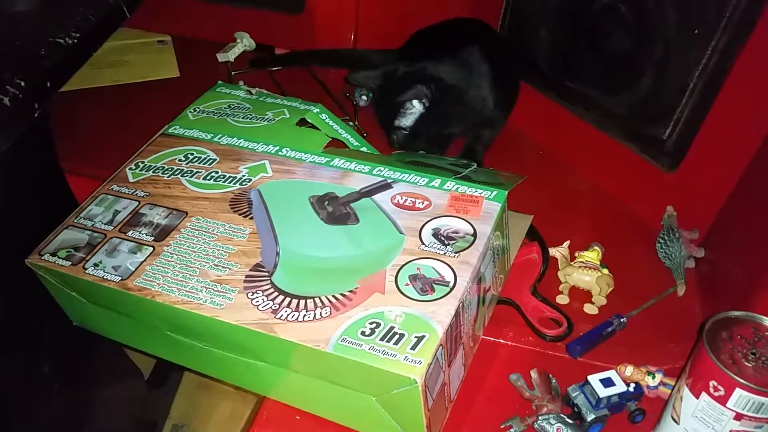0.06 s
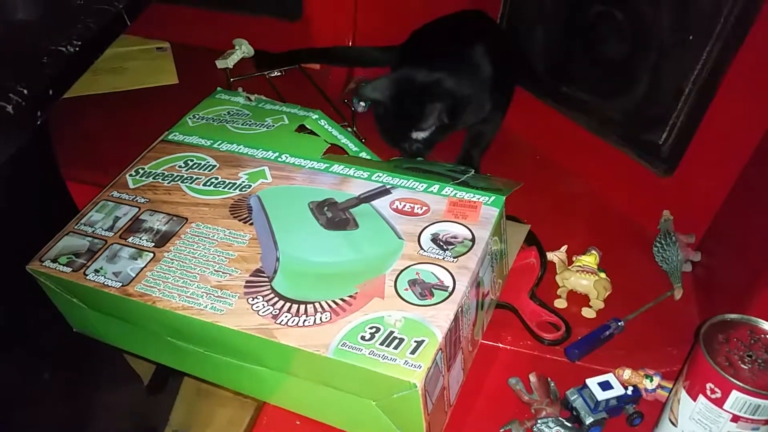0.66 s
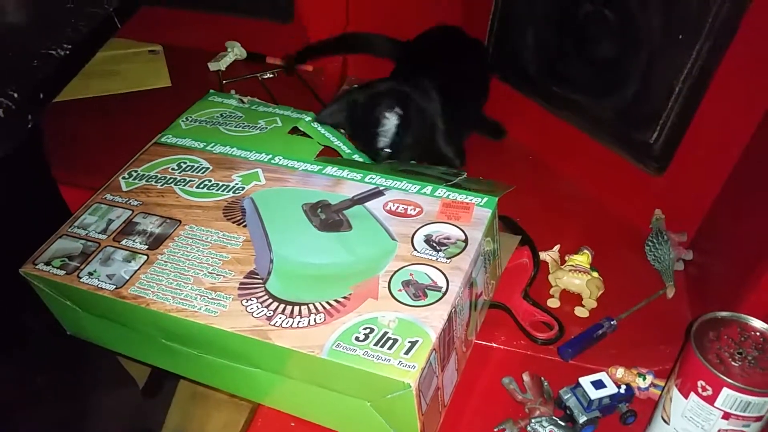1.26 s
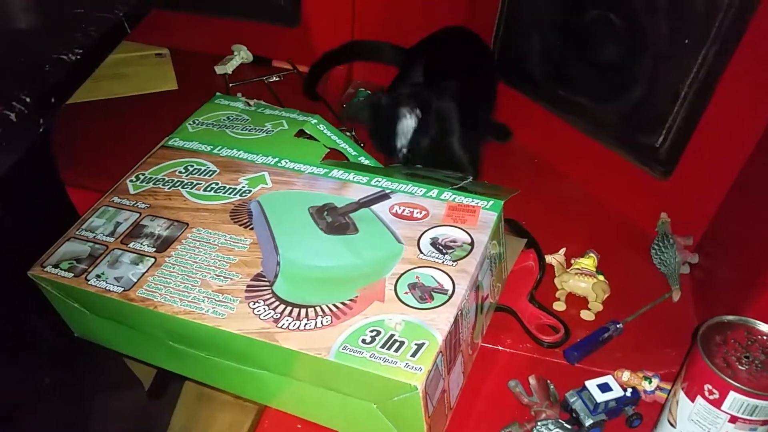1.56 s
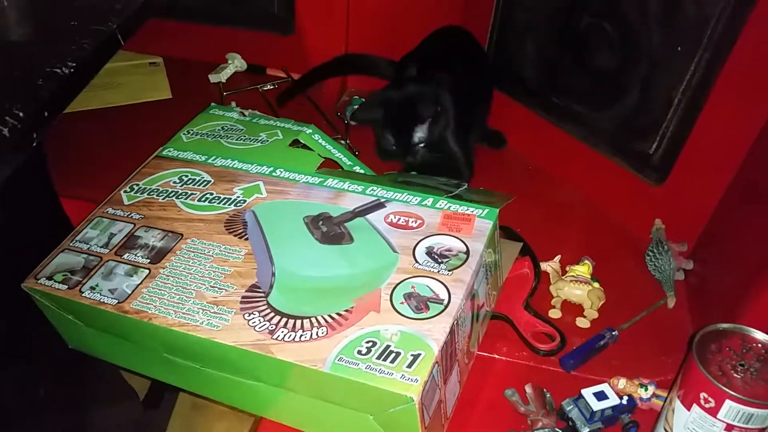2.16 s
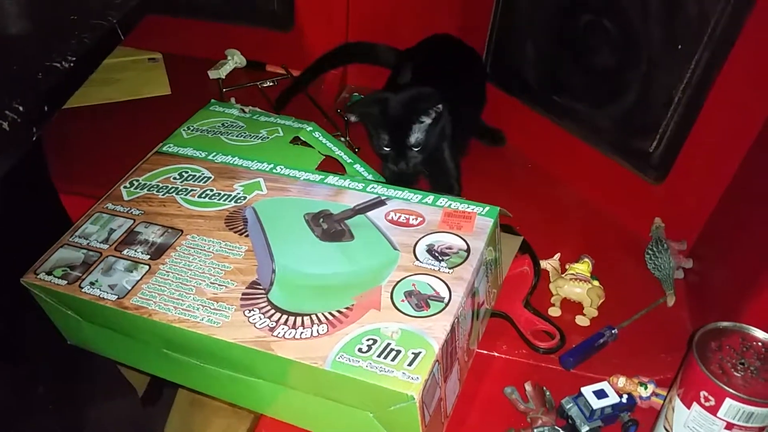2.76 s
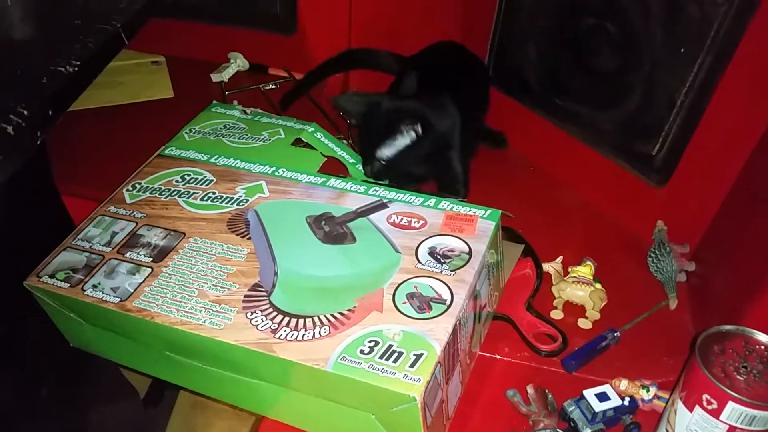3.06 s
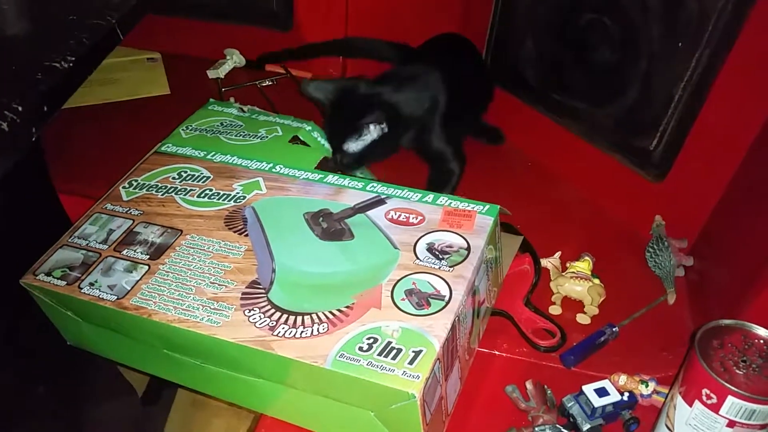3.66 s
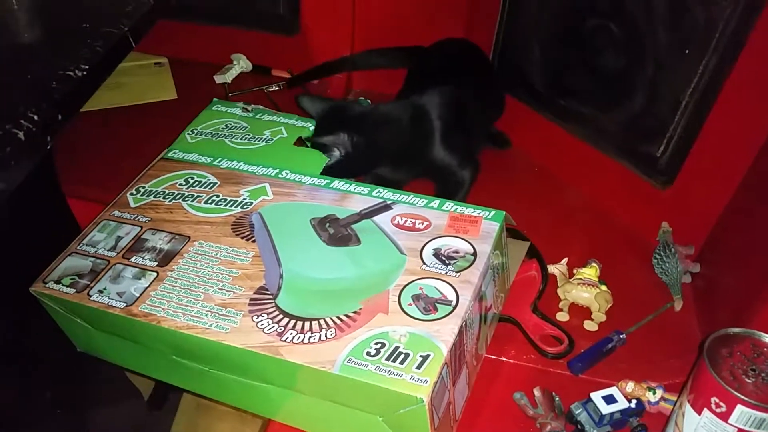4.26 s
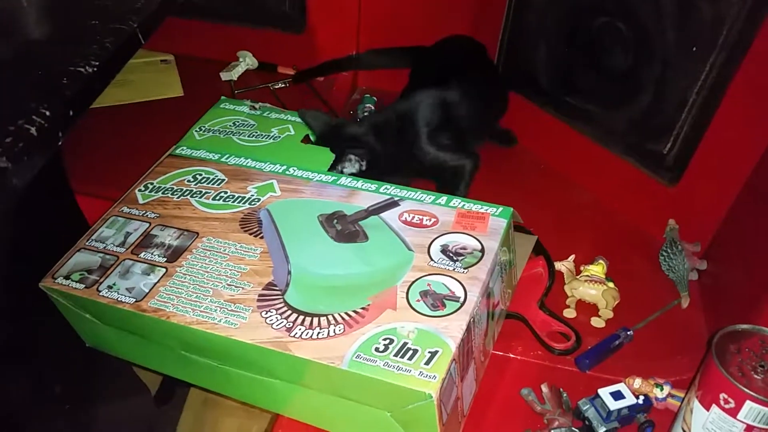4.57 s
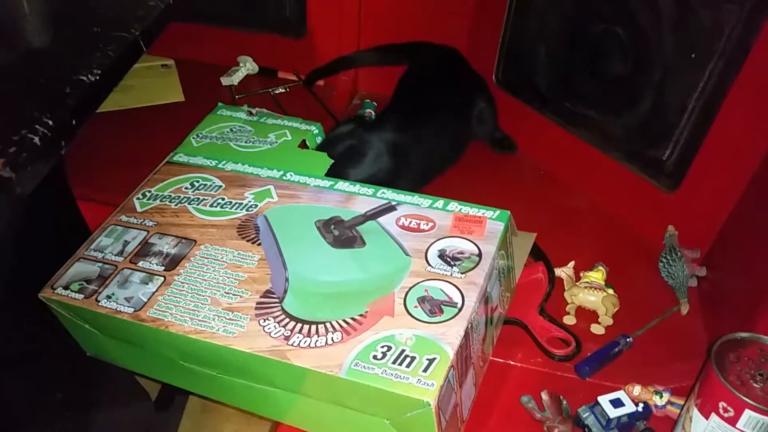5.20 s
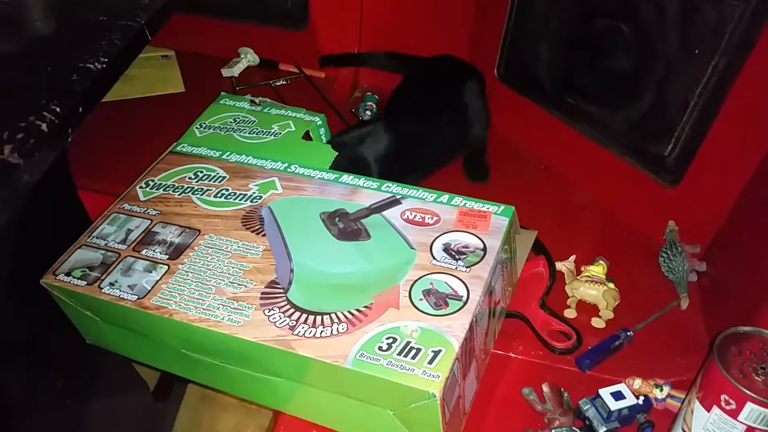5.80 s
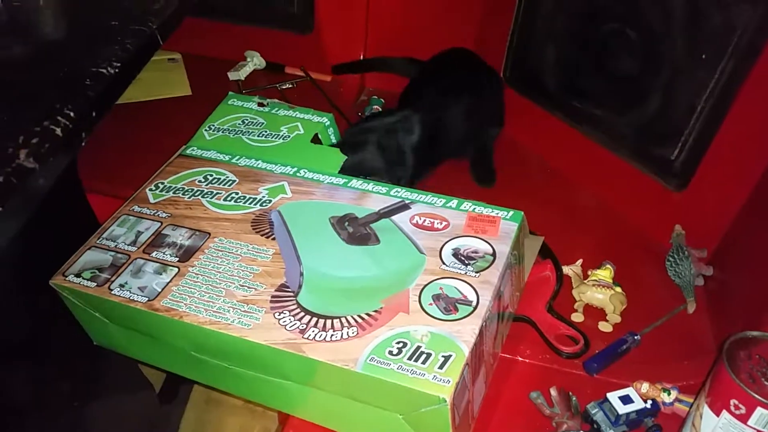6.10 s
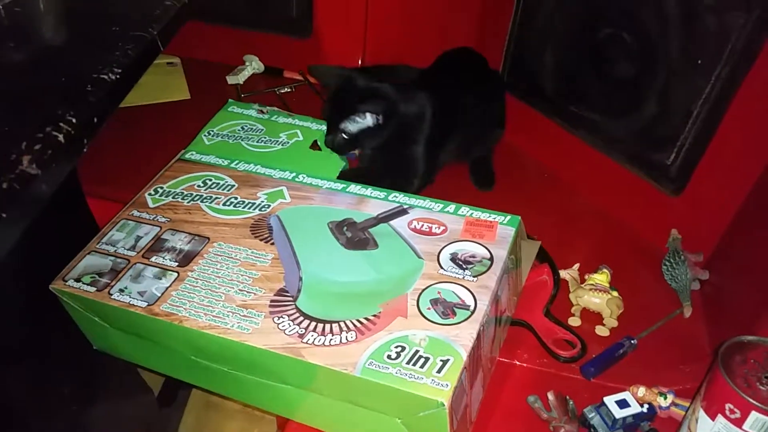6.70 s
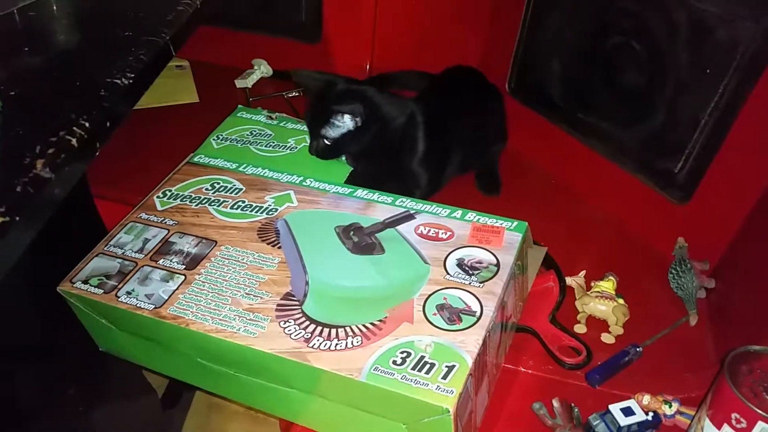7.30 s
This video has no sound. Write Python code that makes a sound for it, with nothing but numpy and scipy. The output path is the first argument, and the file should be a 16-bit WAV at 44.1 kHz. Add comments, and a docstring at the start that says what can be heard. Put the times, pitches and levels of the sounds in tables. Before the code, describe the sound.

A kitten paws and scratches at a cardboard box, with hollow bumps, sharp taps and one thin, high squeak in a small room.

```python
"""Hollow bumps and sharp taps come first: a kitten paws at the flap of a large cardboard box.
Soft pushes boom in the panels, hard contacts clack and ring the lid, and claws rasp as fibres
catch and slip. About four seconds in, one thin, high squeak pulses and breaks into a trill.
Behind it, in a small room, lie a few slow heaves of air, a low rumble and a steady hiss on the left."""
import sys
import numpy as np
from scipy import signal
from scipy.fft import rfft, irfft, next_fast_len
from scipy.io import wavfile
from scipy.ndimage import uniform_filter1d

SR = 44100
rng = np.random.default_rng(int(sys.argv[2]) if len(sys.argv) > 2 else 0)


def store_pcm(level_fs):
    """Save levels as 16-bit WAV."""
    pcm = np.round(np.clip(level_fs, -1, 1) * 32767).astype(np.int16)
    wavfile.write(sys.argv[1], SR, np.atleast_2d(pcm).T)


N = 328545
T = np.arange(N) / SR
ROOM_T60_S = 0.47


def undb(db):
    """Decibels to gain."""
    return 10 ** (np.asarray(db) / 20)


def unit(x):
    """Scale to rms 1."""
    return x / np.sqrt(np.mean(x ** 2))


def fade(t, t60_s):
    """Exponential decay, 60 dB in t60_s."""
    return np.exp(-np.log(1000) * t / t60_s)


def add(out, start_s, x):
    """Mix x into out at start_s."""
    i = int(start_s * SR)
    out[:, i:i + x.shape[1]] += x[:, :N - i]


def at_bins(points, n):
    """Interpolate (freq_hz, value) points at the bins of an n-point spectrum."""
    hz, value = np.transpose(points)
    return np.interp(np.log(np.fft.rfftfreq(n, 1 / SR) + 1), np.log(hz), value)


def colour(x, spectrum):
    """Minimum-phase filter with a (freq_hz, gain_db) response."""
    n = 4096
    cepstrum = irfft(np.log(undb(at_bins(spectrum, n))))
    cepstrum[1:n // 2] *= 2
    cepstrum[n // 2 + 1:] = 0
    impulse = irfft(np.exp(rfft(cepstrum)))
    return signal.fftconvolve(x, impulse[None], axes=1)[:, :x.shape[1]]


# Left-right coherence of the room: freq_hz, correlation
COHERENCE = [(100, 0.98), (200, 0.94), (350, 0.56), (700, 0.44), (1300, 0), (16000, 0)]
def diffuse(n):
    """Stereo room noise: alike in the bass, unrelated in the treble."""
    size = next_fast_len(n, True)
    alike = at_bins(COHERENCE, size)
    mid, side = rfft(rng.standard_normal((2, size))) * np.sqrt([(1 + alike) / 2, (1 - alike) / 2])
    return irfft(np.array([mid + side, mid - side]), size)[:, :n]


# Low panel modes: freq_hz, level_db, t60_factor
BOX_MODES = [(129, -0.5, 1.22), (199.3, -5.5, 1.04), (220.5, -13, 1.68), (263.6, -13, 0.99),
             (354.2, -16, 1.19)]
# Boom of the box: freq_hz, gain_db
BOX_SPECTRUM = [(50, -41.5), (90, -3), (125, 7.5), (165, 2.5), (210, 0.5), (300, -10.5), (430, -9),
                (700, -58.5)]
# Paw and head bumps: start_s, level_db, pitch_hz, upper_modes_db
BUMPS = [(0.522, -34, 92, -3.5), (0.575, -26.5, 124.5, 1), (0.63, -22, 126.5, -28),
         (0.843, -37.5, 116, 0.5), (0.967, -21.5, 127.3, 3.5), (0.998, -16, 127.3, -28),
         (2.455, -25, 138.6, 0), (2.486, -29, 114, 4.5), (2.899, -34, 115.5, -9), (3.238, -37.5, 121, 5),
         (3.41, -34, 150, 10), (3.474, -34, 108, -1), (3.892, -29.5, 125, -3), (3.975, -34.5, 129.2, -5),
         (4.555, -37.5, 146.5, -2.5), (4.964, -38, 138, 7), (5.275, -38.5, 113.5, -18),
         (5.558, -38, 135.7, -1), (6.544, -35.5, 124.4, -10), (6.657, -37.5, 117, -2)]
def bumps(push_s=0.0049, boom_db=3, base_t60_s=0.19, room_db=-14, room_t60_s=0.44):
    """A soft push swells into the panel modes; the room booms on after it."""
    out, t = np.zeros((2, N)), T[:SR // 2]
    swell = 1 - np.exp(-t / push_s)
    for start_s, level_db, pitch_hz, upper_db in BUMPS:
        modes = 0
        for k, (mode_hz, mode_db, t60_factor) in enumerate(BOX_MODES):
            # the struck panel sets the lowest mode's pitch
            hz, db = (mode_hz, mode_db + upper_db) if k else (pitch_hz, mode_db)
            modes += undb(db) * fade(t, base_t60_s * t60_factor) * np.sin(2 * np.pi * hz * t)
        room = undb(room_db) * unit(colour(diffuse(len(t)), BOX_SPECTRUM)) * fade(t, room_t60_s)
        add(out, start_s, undb(level_db + boom_db) * swell * (modes + room))
    return out


def ringing(t60_s, room_db):
    """Dense short ring of the board, then the room's tail."""
    t = T[:SR // 2]
    return diffuse(len(t)) * (fade(t, t60_s) + undb(room_db) * fade(t, ROOM_T60_S))


USUAL_SPOT_HZ = 795
# Struck cardboard: freq_hz, gain_db
BOARD_SPECTRUM = [(120, -15.5), (250, 5.5), (400, 6.5), (750, 0.5), (1250, -2.5), (1700, -10),
                  (2500, -20.5), (4500, -29.5), (6000, -43), (8000, -100), (16000, -89)]
# Claw-tip click and sizzle: freq_hz, gain_db
TIP_SPECTRUM = [(2000, -67), (6000, -29.5), (8500, -27.5), (10000, -13), (12000, 2), (13500, -2),
                (16000, -0.5)]
# Stiff lid modes: freq_hz, level_db
LID_MODES = [(560, 0), (740, -11), (890, -9.5), (1010, -5.5), (1170, -1.5), (1280, -7.5), (1335, -46),
             (1410, -5.5), (1680, -5)]
def contact(pitch_hz, click_db, base_tilt_db_per_oct, board_db=-26, spot_db=-1, lid_db=-23):
    """A hard contact: the struck spot clacks, the lid rings on, the claw tip clicks."""
    t = T[:SR // 2]
    give_s, left_lag_s = 0.002, 0.00017
    # a stiffer spot is higher, brighter and wakes the lid more
    stiffness_oct = np.log2(pitch_hz / USUAL_SPOT_HZ)
    tilt_db_per_oct = base_tilt_db_per_oct + 4 * stiffness_oct
    spectrum = [(hz, db + tilt_db_per_oct * np.log2(hz / 1000)) for hz, db in BOARD_SPECTRUM]
    board = undb(board_db) * unit(colour(ringing(t60_s=0.048, room_db=-4.5), spectrum))
    stereo_t = np.array([t - left_lag_s, t])
    spot = undb(spot_db) * fade(t, t60_s=0.029) * np.sin(2 * np.pi * pitch_hz * stereo_t)
    modes = sum(undb(db) * np.sin(2 * np.pi * (hz * t + rng.random((2, 1)))) for hz, db in LID_MODES)
    lid = undb(lid_db + 7 * stiffness_oct) * fade(t, t60_s=0.16) * modes
    click = undb(click_db) * unit(colour(ringing(t60_s=0.02, room_db=-20), TIP_SPECTRUM))
    onset = 1 - np.exp(-t / give_s)  # cardboard gives way
    return onset * (board + spot + lid) + click


# Knocks on the board: start_s, level_db, pitch_hz
KNOCKS = [(0.567, -23, 867), (0.586, -26, 850), (0.631, -29, 545), (0.959, -12.5, 1270),
          (1.151, -27.5, 1020), (1.183, -24.5, 500), (2.205, -44.5, 900), (2.387, -43.5, 820),
          (2.453, -27.5, 870), (2.484, -23.5, 987), (2.978, -38, 1060), (3.447, -33.5, 550),
          (3.472, -30, 580), (3.538, -23, 677), (3.557, -33, 544), (3.892, -34.5, 420), (4.765, -38, 785),
          (4.807, -32.5, 790), (4.96, -31, 810), (5.107, -45, 1050), (5.49, -37, 810), (5.979, -38.5, 810),
          (6.379, -45, 990), (6.574, -35, 383), (6.632, -35.5, 800), (6.669, -35, 770), (6.694, -40, 775),
          (7.25, -41, 750), (7.354, -41.5, 1250)]
def knocks():
    """Paws and the flap strike spots of differing stiffness."""
    out = np.zeros((2, N))
    for start_s, level_db, pitch_hz in KNOCKS:
        add(out, start_s, undb(level_db) * contact(pitch_hz, click_db=-43, base_tilt_db_per_oct=0.5))
    return out


# Claw-tip snaps: start_s, level_db
CLAW_TICKS = [(0.973, -30.5), (1.416, -46), (1.52, -54), (2.62, -38.5), (2.668, -35.5), (2.976, -44),
              (3.536, -39), (3.616, -42), (3.71, -51), (4.998, -35.5), (7.009, -41)]
def claw_ticks():
    """A bare claw tip catches and snaps free: brighter than a knock, with more click."""
    out = np.zeros((2, N))
    for start_s, level_db in CLAW_TICKS:
        tick = contact(USUAL_SPOT_HZ, click_db=-23.5, base_tilt_db_per_oct=7.5)
        add(out, start_s, undb(level_db) * tick)
    return out


def friction(spectrum, slips_per_s, spread_db, t60_s, room_db):
    """Fibres catch and let go at random; each slip is a tiny burst that the room prolongs."""
    sizes = undb(spread_db * np.minimum(rng.exponential(size=N), 4))
    slips = sizes * (rng.random(N) < slips_per_s / SR)
    t = T[:SR // 2]
    burst_power = fade(t, t60_s) ** 2 + (undb(room_db) * fade(t, ROOM_T60_S)) ** 2
    power = signal.fftconvolve(slips ** 2, burst_power)[:N]
    return unit(colour(diffuse(N) * np.sqrt(np.abs(power)), spectrum))


def lid_resonance(rub, width_hz, ring_db):
    """Rubbing rings the lid's modes, which gives it a hollow voice."""
    rings = sum(undb(db) * signal.lfilter(*signal.iirpeak(hz, hz / width_hz, fs=SR), rub)
                for hz, db in LID_MODES)
    return unit(rub + undb(ring_db) * rings)


# Fur and paws shuffling on the box: start_s, length_s, level_db
BOUTS = [(0.49, 0.8, -59), (2.27, 0.5, -60), (3.271, 0.29, -56.5), (4.48, 0.078, -62.5), (4.736, 0.77, -58),
         (5.88, 0.44, -62), (6.46, 0.39, -59.5), (6.97, 0.36, -59.5)]
def shuffle_envelope(attack_s=0.12, release_s=0.29):
    """In each bout the kitten leans in quickly, holds, and settles slowly."""
    envelope = np.zeros(N)
    for start_s, length_s, level_db in BOUTS:
        attack = np.clip((T - start_s) / attack_s, 0, 1)
        release = np.exp(-np.maximum(T - start_s - length_s, 0) / release_s)
        envelope = np.maximum(envelope, undb(level_db) * attack * release)
    return envelope


# Rubbed cardboard: freq_hz, gain_db
RASP_SPECTRUM = [(150, -6.5), (350, 4.5), (520, 0), (780, 4), (1250, -3), (1750, -5.5), (2400, -9),
                 (3400, -10.5), (4400, -3.5), (6200, -28.5), (8500, -92), (16000, -44)]
# Claw digging in: freq_hz, gain_db
BITE_SPECTRUM = [(600, -15), (1400, 9), (2300, -4), (3300, -14), (4600, -20), (7000, -21)]
# Claws drawn over the board: start_s, length_s, rasp_db, sizzle_db
STROKES = [(0.314, 0.12, -72, -65), (0.559, 0.051, -47, -49.5), (0.781, 0.086, -50, -49.5),
           (1.09, 0.14, -49, -54), (2.425, 0.047, -53.5, -61), (2.467, 0.045, -45.5, -41),
           (2.506, 0.061, -45.5, -44.5), (2.66, 0.12, -53, -54), (2.972, 0.044, -51.5, -51),
           (3.354, 0.21, -52.5, -78), (3.912, 0.098, -58.5, -59), (4.148, 0.063, -66, -63.5),
           (4.443, 0.11, -62.5, -56.5), (4.885, 0.12, -47.5, -43.5), (5.092, 0.061, -48.5, -53),
           (5.323, 0.083, -54.5, -73), (5.478, 0.1, -52.5, -60), (5.642, 0.099, -52.5, -55.5),
           (6.208, 0.1, -76, -52), (6.613, 0.14, -45.5, -43.5), (6.948, 0.26, -55, -51.5),
           (7.233, 0.054, -53, -51)]
def scratching(idle_db=-64, drone_db=9, shuffle_sizzle_db=0.5, bite_db=-7):
    """Light shuffling and firmer claw strokes rasp; the shuffling keeps the panels droning."""
    bouts = shuffle_envelope()
    shuffle = np.hypot(bouts, undb(idle_db))  # faint rubbing between bouts
    claws, sizzle_gain = np.zeros(N), bouts * undb(shuffle_sizzle_db)
    for start_s, length_s, rasp_db, sizzle_db in STROKES:
        # bite, drag, lift off
        pressure = np.interp(T, start_s + length_s * np.array([0, .3, .7, 1.3]), [0, 1, .9, 0])
        claws = np.hypot(claws, pressure * undb(rasp_db))
        sizzle_gain = np.hypot(sizzle_gain, pressure * undb(sizzle_db))
    # the firmest strokes tear fibres: brighter and denser
    bite_gain = undb(bite_db) * claws * np.sqrt(claws / claws.max())
    drone = undb(drone_db) * unit(colour(diffuse(N), BOX_SPECTRUM))
    rasp = friction(RASP_SPECTRUM, slips_per_s=450, spread_db=-3, t60_s=0.03, room_db=-13)
    rasp = lid_resonance(rasp, width_hz=22, ring_db=3)
    bite = friction(BITE_SPECTRUM, slips_per_s=2000, spread_db=5, t60_s=0.009, room_db=-22)
    bite = lid_resonance(bite, width_hz=28, ring_db=-5)
    sizzle = friction(TIP_SPECTRUM, slips_per_s=780, spread_db=2, t60_s=0.018, room_db=-12)
    return shuffle * drone + np.hypot(shuffle, claws) * rasp + bite_gain * bite + sizzle_gain * sizzle


# Squeak harmonics: multiple, level_db
SQUEAK_PARTIALS = [(1, -0.5), (2, -19), (3, -32), (4, -27), (5, -20)]
# Quickening opening pulses: centre_s, half_width_s, level_db
SQUEAK_PULSES = [(3.934, 0.016, -47), (3.979, 0.015, -40.5), (4.016, 0.0076, -40.5)]
def squeak(start_hz=2615, top_hz=2688, rise_hz_per_s=720):
    """A nearly pure tone slides up a little, breaks into an uneven trill and rings in the room."""
    trill_start_s, trill_end_s, trill_hz, trill_depth, trill_db = 4.03, 4.14, 56.1, 0.84, -47
    glide_hz = np.clip(start_hz + rise_hz_per_s * (T - SQUEAK_PULSES[0][0]), start_hz, top_hz)
    trill_gate = np.clip(np.minimum(T - trill_start_s, trill_end_s - T) / .005, 0, 1)
    wobble = unit(uniform_filter1d(rng.standard_normal(N), size=600))
    flutter = trill_depth * np.sin(2 * np.pi * np.cumsum(trill_hz * (1 + .25 * wobble)) / SR)
    pitch_hz = glide_hz * (1 + .018 * trill_gate * flutter + .003 * wobble)
    phase = 2 * np.pi * np.cumsum(pitch_hz) / SR
    pulses = sum(undb(db) * np.exp(-((T - centre_s) / half_width_s) ** 2)
                 for centre_s, half_width_s, db in SQUEAK_PULSES)
    trill = trill_gate * undb(trill_db) * fade(np.abs(T - trill_start_s), t60_s=0.45) * (1 + flutter)
    overtones_db = -3 - 8 * trill_gate  # weaker once the tone breaks up
    partials = sum(undb(db + overtones_db * (k > 1)) * np.sin(k * phase) for k, db in SQUEAK_PARTIALS)
    tone = (pulses + trill) * partials
    walls = diffuse(SR // 2) * fade(T[:SR // 2], t60_s=0.25)
    walls /= np.sqrt(np.sum(walls ** 2) / 2)
    return tone + .4 * signal.fftconvolve(tone[None], walls, axes=1)[:, :N]


# Air heaving at the microphone: start_s, level_db
HEAVES = [(5.48, -40.5), (6.148, -43), (6.228, -44.5), (6.917, -36.5), (6.988, -36.5)]
def air_heaves(pitch_hz=32, swell_s=0.026):
    """A few slow cycles of air pressure, the same on both sides."""
    out, t = np.zeros((2, N)), T[:SR // 3]
    heave = t / swell_s * np.exp(1 - t / swell_s) * np.sin(2 * np.pi * pitch_hz * t)
    for start_s, level_db in HEAVES:
        add(out, start_s, undb(level_db) * heave[None])
    return out


# Room air: freq_hz, gain_db
RUMBLE_SPECTRUM = [(15, -14), (30, -18.5), (55, 1), (75, 1.5), (90, -17), (120, -4.5), (165, -8.5),
                   (215, 2), (280, -14), (400, -9), (600, -18), (1200, -29), (2400, -48.5), (5000, -75)]
def room_rumble(level_db=-52):
    """The room's steady low murmur of air."""
    return undb(level_db) * unit(colour(diffuse(N), RUMBLE_SPECTRUM))


# Left microphone noise: freq_hz, gain_db
HISS_LEFT = [(1000, -35), (2200, -33), (2950, -17), (3450, -23), (3850, -5), (4250, 0), (4650, -2),
             (5450, -14), (6150, -46), (7500, -60), (12200, -30), (16000, -33)]
# Right microphone noise: freq_hz, gain_db
HISS_RIGHT = [(1000, -8), (3400, -7), (4300, -2), (5400, -13), (6200, -29), (9300, -29), (12200, 0),
              (13500, -7), (16000, -7)]
def microphone_hiss(left_db=-53.3, right_db=-71):
    """Each microphone's own steady hiss, far stronger on the left."""
    return np.vstack([undb(db) * unit(colour(rng.standard_normal((1, N)), spectrum))
                      for db, spectrum in ((left_db, HISS_LEFT), (right_db, HISS_RIGHT))])


def scene():
    """Kitten, box and room together."""
    return bumps() + knocks() + claw_ticks() + scratching() + squeak() + air_heaves() + room_rumble()


# Microphone port resonances: freq_hz, left_minus_right_db
PORT_BALANCE = [(100, -2.4), (300, -3), (600, -1), (1300, -2), (2500, 2), (3600, 1), (4400, 11), (6000, 12),
                (8000, 3), (10500, 2), (12200, -9), (16000, -7)]
def record(dry):
    """Two ports colour the sound differently, the microphones add hiss, a low-pass cuts the top."""
    size = next_fast_len(N, True)
    port_gains = undb(np.outer([.5, -.5], at_bins(PORT_BALANCE, size)))
    heard = irfft(rfft(dry, size) * port_gains, size)[:, :N]
    cutoff_hz = 15750
    lowpass = signal.ellip(10, .2, 70, cutoff_hz, fs=SR, output="sos")
    return signal.sosfilt(lowpass, heard + microphone_hiss())


dry = scene()
out = record(dry)
store_pcm(out)
```